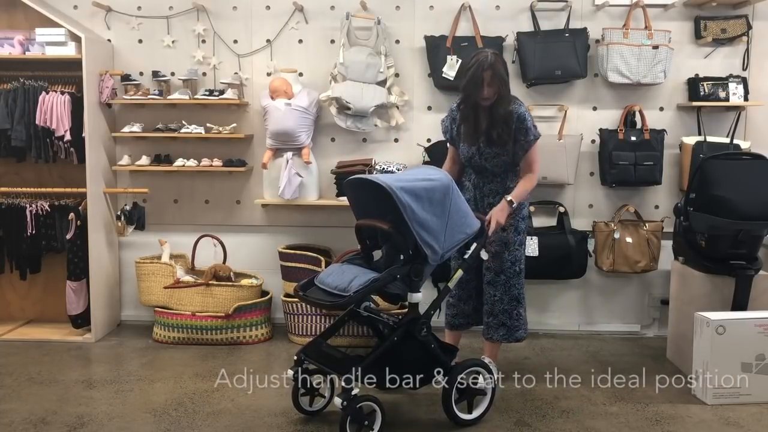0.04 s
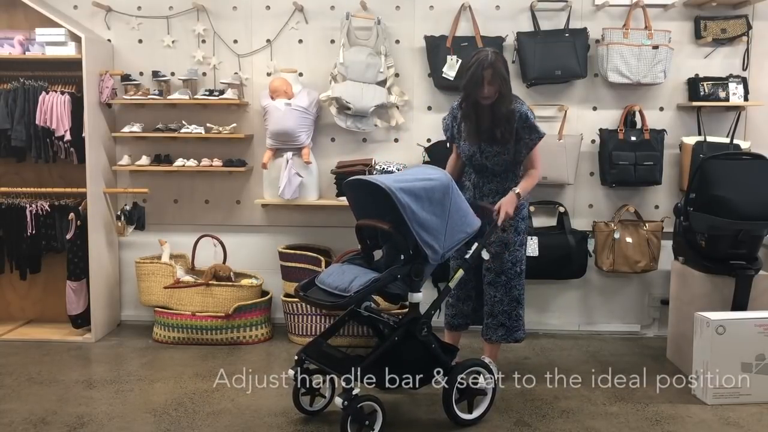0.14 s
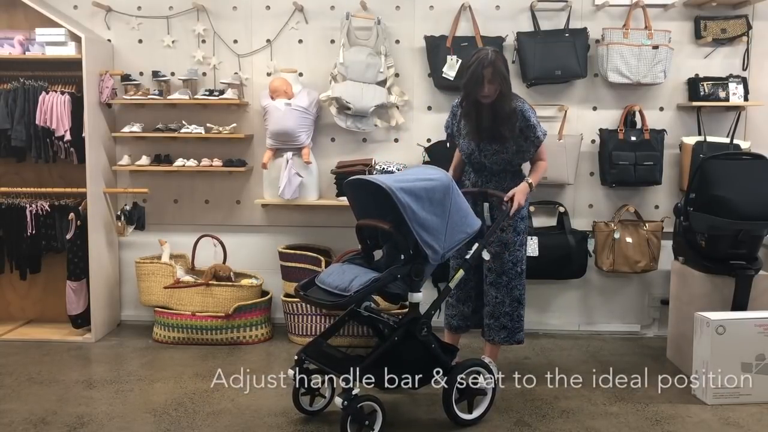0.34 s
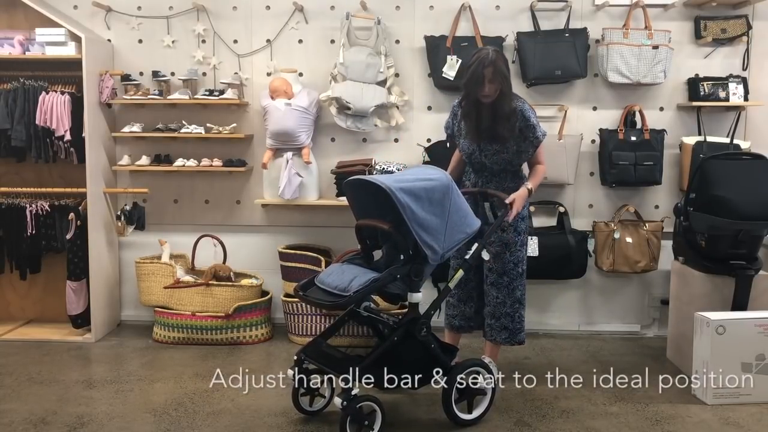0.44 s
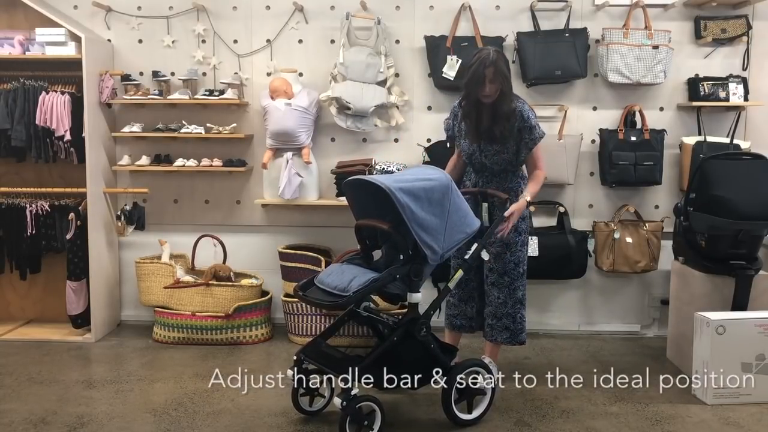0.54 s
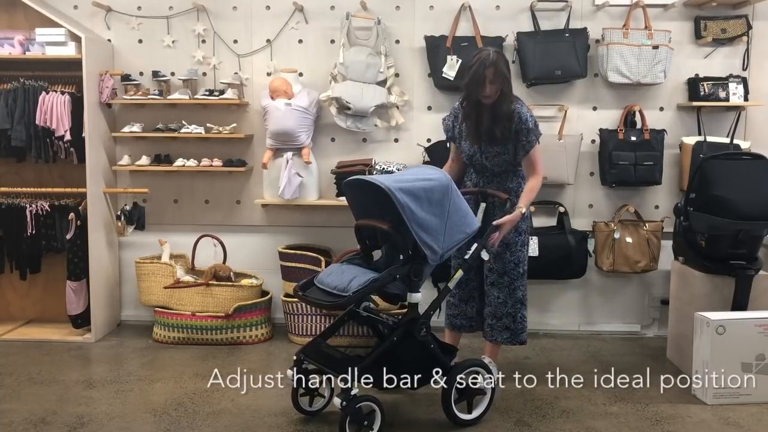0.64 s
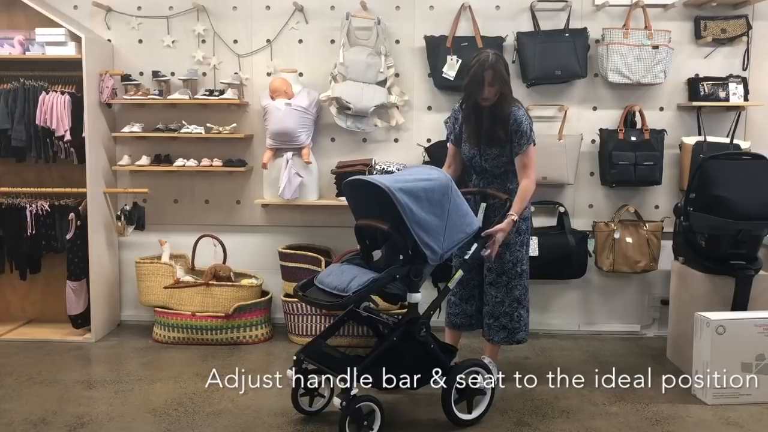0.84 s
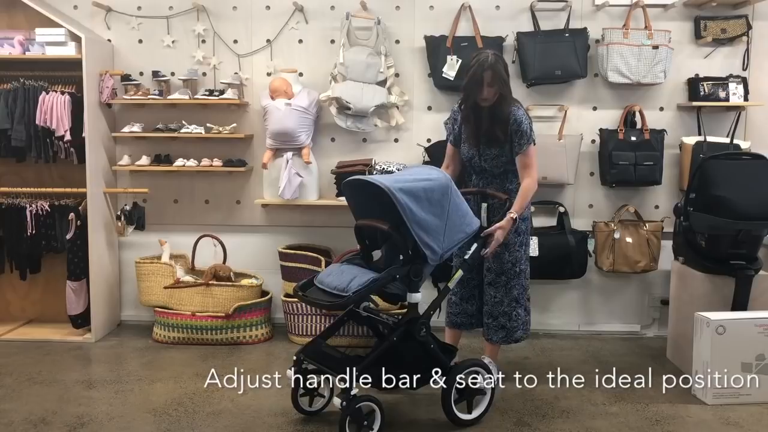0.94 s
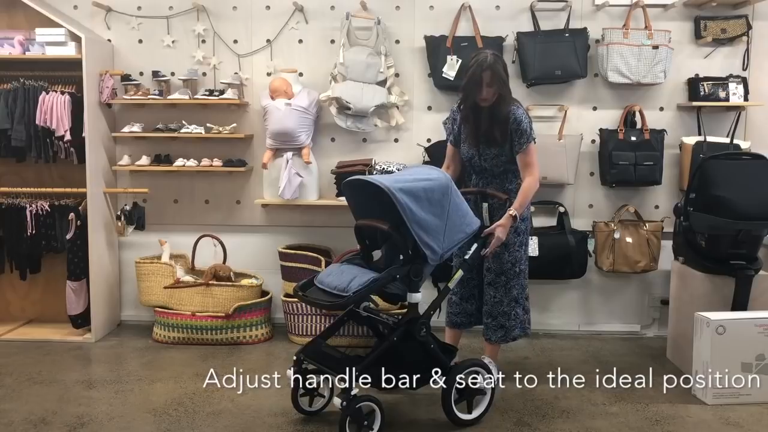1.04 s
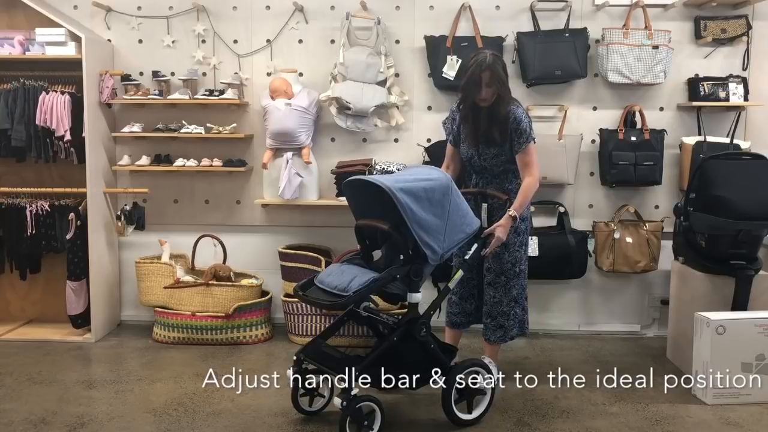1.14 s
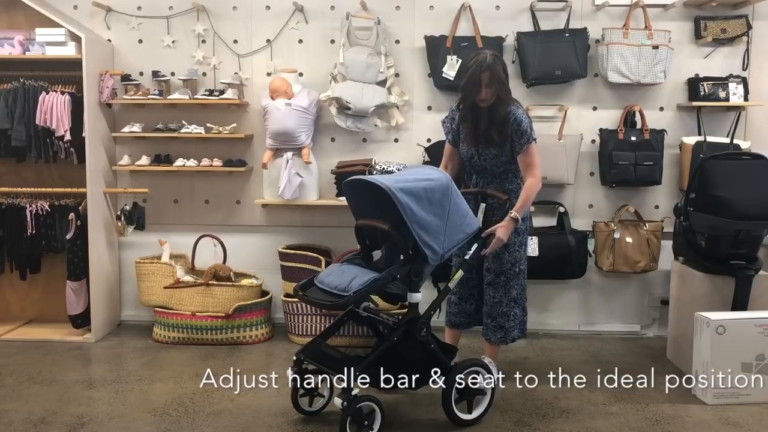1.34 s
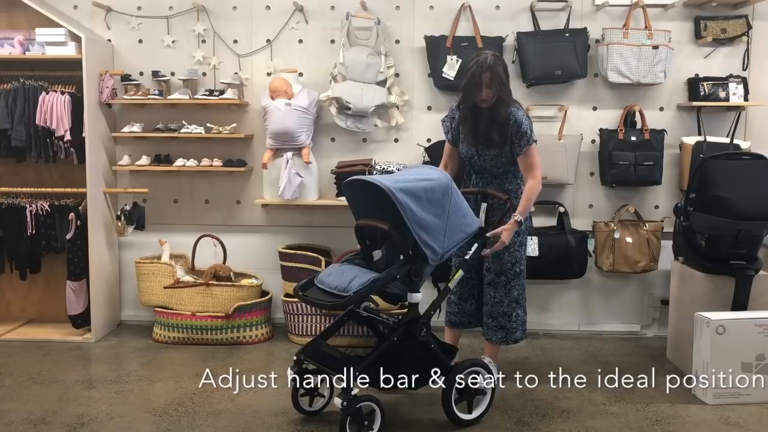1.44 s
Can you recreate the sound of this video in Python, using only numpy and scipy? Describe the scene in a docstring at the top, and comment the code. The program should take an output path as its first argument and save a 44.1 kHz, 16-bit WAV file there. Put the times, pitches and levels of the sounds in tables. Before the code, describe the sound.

A stroller handle is adjusted a few metres away in a quiet, slightly echoing shop: a short ratcheting rattle with a metallic ring, a faint fabric crackle, scattered ticks and knocks, and a final locking snap over soft ventilation.

```python
"""A stroller's handlebar is adjusted in a quiet shop, a few metres away. Over the hum of ventilation
the handled frame rumbles; the tube slides with a grainy rub and the plastic joint knocks. A pawl
rattles over seven ratchet teeth, setting the tube ringing, and the frame shudders. Fabric crackles
faintly, then the tube creeps on amid ticks of a small catch and more knocks. Last, the lock snaps
home and bounces. Each impact excites the resonances of its part and reverberates briefly."""
import sys
import numpy as np
from scipy import signal
from scipy.fft import rfft, irfft
from scipy.io import wavfile

SR = 44100
rng = np.random.default_rng(int(sys.argv[2]) if len(sys.argv) > 2 else 0)


def inscribe(sig):
    """Save sig as 16-bit PCM at rate SR to the path in sys.argv[1].

    A 1-D sig is mono; a 2-D sig holds one channel per row.
    Samples are clipped to [-1, 1] before scaling.
    """
    pcm = np.round(np.clip(np.atleast_2d(sig).T, -1, 1) * 32767)
    wavfile.write(sys.argv[1], SR, pcm.astype(np.int16))


N = 66150

# reverberation time of the shop: f/Hz, T60/s
ROOM_DECAY = [(150, 0.35), (700, 0.43), (2000, 0.67), (4000, 0.6148), (8000, 0.46), (11000, 0.3169),
              (16000, 0.27)]
# spectrum of the reverberant tail: f/Hz, level/dB
TAIL_SPECTRUM = [(150, 12), (1000, 0), (3000, 0), (8000, 0), (16000, -3)]
# spectrum of the ventilation noise: f/Hz, level/dB
AIR_SPECTRUM = [(20, -46), (31, -24.5), (42, -15.5), (55, 2.5), (75, -8), (110, 0.5), (180, -5.5),
                (350, -11), (900, -11), (1200, -14), (1600, -12.5), (2100, -11.5), (2800, -25.5),
                (7000, -31.5), (16000, -33)]
# partials of the hum: f/Hz, level/dB
HUM_PARTIALS = [(54, -70.5), (169, -74.5)]
# envelope of the handled frame's rumble: t/s, level/dB
RUMBLE_ENVELOPE = [(0, -76), (.2, -61), (.36, -56.5), (.55, -77), (.78, -75), (1.0, -58.5), (1.2, -57),
                   (1.5, -57.5)]
# spectrum of the rumble: f/Hz, level/dB
RUMBLE_SPECTRUM = [(25, -55), (60, -16), (105, -2), (135, -4), (155, -10.5), (169, 7), (188, -1.5),
                   (240, -8), (400, -14.5), (1500, -59)]
# envelope of the tube's first slide: t/s, level/dB
SLIDE_ENVELOPE = [(.06, -31.5), (.085, -10), (.103, 1), (.14, -0.5), (.16, -30)]
# spectrum of the sliding tube: f/Hz, level/dB
SLIDE_SPECTRUM = [(300, -7.5), (1000, -5.5), (4000, -1), (5300, -8.5), (6900, 11), (8100, -8), (9100, 3),
                  (10500, -2.5), (16000, -9)]
# knocks of the joint: t/s, level/dB, tilt/(dB per octave), resonance f/Hz, resonance gain/dB
JOINT_KNOCKS = [(.072, -15.5, -3, 950, 13.5), (0.859, -9.5, -7.5, 2020, 6.5), (0.9789, -5.5, 0, 3060, 15),
                (0.992, -15, -5, 570, 13), (1.07, -4, -1.5, 3390, 14.5), (1.076, -1.5, 1.5, 6130, 6)]
# spectrum of the plastic joint: f/Hz, level/dB
JOINT_SPECTRUM = [(100, -13.5), (400, -15), (1000, -2.5), (2000, 1.5), (3400, -2), (4500, 0.5),
                  (6200, -4.5), (8500, -7.5), (12000, -22), (16000, -30.5)]
# drops of the pawl: t/s, level/dB, time constant of the scrape before it/s, tilt/(dB per octave)
PAWL_DROPS = [(0.147, -5.5, 0.0018, -1.1), (0.1885, -2.5, 0.00085, 0.5), (.2237, -0.5, 0.0027, 0.5),
              (0.2554, 0.5, 0.004, 1), (0.2869, 0.5, 0.012, 2.5), (.3230, -3, 0.0024, 0.14),
              (0.3952, -12, 0.00067, -1.5)]
# spectrum of the ratchet: f/Hz, level/dB
RATCHET_SPECTRUM = [(59, -65), (100, -39.5), (266, -25.5), (547, -22.5), (595, -23.5), (801, -16),
                    (1130, -15), (1310, -12.5), (3120, -7.5), (3940, -4.5), (4670, -4.5), (8460, -1),
                    (16000, -8)]
# normal modes of the tube: f/Hz, level/dB, T60/s
TUBE_MODES = [(2001, -9.5, 0.73), (3910, -2, 0.6), (4410, -14, .35), (5700, -23, 0.19), (6180, 0, 0.42),
              (6540, 16, 0.1), (7200, -7, .25), (8381, 11, 0.12), (8500, 7.5, 0.41), (10000, -5, 0.13),
              (10680, 14.5, 0.12)]
# envelope of the frame's shudder: t/s, level/dB
SHUDDER_ENVELOPE = [(.33, -31), (.36, 4), (.39, -18), (.46, -17)]
# spectrum of the shudder: f/Hz, level/dB
SHUDDER_SPECTRUM = [(30, -30.5), (80, 0), (120, -6), (170, -3), (300, -15.5), (1000, -49)]
# envelope of the fabric's crackle: t/s, level/dB
FABRIC_ENVELOPE = [(.55, -18), (.6, 12), (.64, -8), (.67, -2), (.7, 0), (.74, -29), (.78, -7), (.83, 0),
                   (.87, -18)]
# spectrum of the fabric: f/Hz, level/dB
FABRIC_SPECTRUM = [(300, 3.5), (2000, -6.5), (6000, 5), (11000, 3), (16000, 0.5)]
# envelope of the tube's creep: t/s, level/dB
CREEP_ENVELOPE = [(.82, -25.5), (.86, -13), (.92, -1.5), (.97, -9), (1.01, -19), (1.06, -33)]
# spectrum of the creeping tube: f/Hz, level/dB
CREEP_SPECTRUM = [(300, -31), (950, -7), (1400, -21.5), (2000, -8), (2700, -12), (3500, -8.5), (4200, 6.5),
                  (5100, -4.5), (6100, 1), (7400, -19), (8500, 3.5), (10000, -10), (12500, -18),
                  (16000, -26)]
# ticks of the catch: t/s, level/dB, resonance f/Hz
CATCH_TICKS = [(0.8416, 2, 10000), (.884, 1.5, 9400), (0.915, -1, 8400), (.9245, -24, 9200),
               (0.9664, -2.5, 8400), (1.015, -18, 12500)]
# spectrum of the catch: f/Hz, level/dB
CATCH_SPECTRUM = [(300, -18), (2800, -6), (4200, -5.5), (5200, -10), (8500, 1), (11000, -2.5),
                  (12500, -6.5), (16000, -6.5)]
# impact and rebounds of the lock: t/s, level/dB
LOCK_SNAPS = [(1.2257, -1.5), (1.227, -2), (1.2326, -1)]
# spectrum of the lock: f/Hz, level/dB
LOCK_SPECTRUM = [(60, -50.5), (180, -18), (400, -19), (650, -9), (900, -16), (1200, -9), (1600, -16),
                 (2100, -7), (3400, -3.5), (4400, -5.5), (4900, -3.5), (5400, -10.5), (6200, -6),
                 (6550, -0.5), (7500, -1), (8500, -1), (9400, -8), (11000, -6), (13400, -14), (15300, -10)]


def amp(db):
    """Decibel law: amplitude grows tenfold for every 20 dB."""
    return 10 ** (np.asarray(db) / 20)


def unit(x):
    """Normalisation: scales a signal to energy 1."""
    return x / np.sqrt(np.sum(x ** 2) + 1e-20)


def curve_at(points, hz):
    """Interpolation on a logarithmic frequency axis."""
    f, value = np.transpose(points)
    return np.interp(np.log(hz + 1), np.log(f + 1), value)


def add(mix, start_s, sound):
    """Superposition: a sound adds to the mix from its onset."""
    part = mix[max(round(start_s * SR), 0):][:len(sound)]
    part += sound[:len(part)]


def envelope(points):
    """Amplitude envelope: linear in decibels between points, held beyond them."""
    return amp(np.interp(np.arange(N) / SR, *np.transpose(points)))


def body(spectrum, tilt_db=0, ring_hz=0, ring_db=0, width_hz=1, size=4096):
    """Minimum-phase impulse response, energy 1: a spectrum tilted above 800 Hz, plus one resonance."""
    hz = np.fft.rfftfreq(size, 1 / SR)
    db = curve_at(spectrum, hz) + tilt_db * np.log2(np.maximum(hz, 800))
    db += ring_db / (1 + (2 * (hz - ring_hz) / width_hz) ** 2)
    log_gain = np.log(amp(np.r_[db, db[-2:0:-1]]))
    transfer = np.exp(np.conj(signal.hilbert(log_gain)))
    return unit(np.fft.ifft(transfer).real[:size // 2])


def noise(spectrum):
    """Spectral shaping: white noise filtered to a given spectrum, rms 1."""
    gain = amp(curve_at(spectrum, np.fft.rfftfreq(N, 1 / SR)))
    shaped = irfft(rfft(rng.standard_normal(N)) * gain, N)
    return unit(shaped) * np.sqrt(N)


def grains(size, spread):
    """Random force: tiny impacts with a log-normal spread of strength."""
    return rng.standard_normal(size) * np.exp(spread * rng.standard_normal(size))


def friction(stroke, spectrum, spread):
    """Source and filter: a grainy friction force drives the response of the rubbed part."""
    force = grains(N, spread) * envelope(stroke)
    return signal.fftconvolve(force, body(spectrum))[:N]


def shop(x, tail_db=0, size=24576):
    """Reverberation: direct sound, early reflections from frame, floor and wall, then a decaying tail."""
    direct_db, early_db, early_s, tail_rise_s = -9.5, 1, 0.0091, 0.0043
    t = np.arange(size) / SR
    hz, age, bands = signal.stft(rng.standard_normal(size), SR, nperseg=256)
    t60 = curve_at(ROOM_DECAY, hz)[:, None]
    bands *= amp(tail_db + curve_at(TAIL_SPECTRUM, hz)[:, None] - 60 * age / t60)
    bands *= np.sqrt(2 * np.log(1000) / (t60 * SR))  # makes a band's energy independent of its T60
    response = signal.istft(bands, SR, nperseg=256)[1][:size] * (1 - np.exp(-t / tail_rise_s))
    reflections = grains(2048, spread=0.55) * np.exp(-(t[:2048] / early_s) ** 2)
    add(response, 0, amp(early_db) * unit(reflections))
    response[0] += amp(direct_db)
    return signal.fftconvolve(x, response)


def ventilation():
    """Stationary sound: broadband air noise with a faint hum of two pure tones."""
    t = np.arange(N) / SR
    hum = sum(amp(db) * np.sqrt(2) * np.sin(2 * np.pi * (hz * t + rng.random()))
              for hz, db in HUM_PARTIALS)
    return amp(-59) * noise(AIR_SPECTRUM) + hum


def frame_rumble():
    """Forced vibration: handling drives the frame at low frequencies."""
    return envelope(RUMBLE_ENVELOPE) * noise(RUMBLE_SPECTRUM)


def tube_slide():
    """Sliding friction: the tube rubs in its sleeve on the way to the first tooth."""
    return amp(-49) * friction(SLIDE_ENVELOPE, SLIDE_SPECTRUM, spread=0.33)


def joint_knocks():
    """Impact excitation: each blow on the plastic joint sounds a heavily damped resonance."""
    out = np.zeros(N)
    for start_s, db, tilt_db, ring_hz, ring_db in JOINT_KNOCKS:
        knock = body(JOINT_SPECTRUM, tilt_db, ring_hz, ring_db, width_hz=380)
        add(out, start_s, amp(db - 12.5) * shop(knock))
    return out


def ratchet(size=1024):
    """Modal excitation: the pawl scrapes up each tooth, drops and chatters; the tube rings freely."""
    ratchet_db, ring_db, chatter_db, chatter_s = 6, -1, 1.5, 0.0043
    out = np.zeros(N)
    t = np.arange(-size, size) / SR  # zero at the drop
    age = np.arange(SR // 2) / SR
    drop = 1. * (t == 0)
    for drop_s, db, scrape_s, tilt_db in PAWL_DROPS:
        scrape = unit(grains(len(t), spread=0.46) * (t < 0) * np.exp(-abs(t) / scrape_s))
        chatter = unit(grains(len(t), spread=0.65) * (t > 0) * np.exp(-abs(t) / chatter_s))
        response = body(RATCHET_SPECTRUM, tilt_db)
        for force in (scrape, drop, amp(chatter_db) * chatter):
            add(out, drop_s + t[0], amp(db) * shop(signal.fftconvolve(force, response)))
        ring = sum(amp(mode_db - 60 * age / t60) * np.sin(2 * np.pi * (hz * age + rng.random()))
                   for hz, mode_db, t60 in TUBE_MODES)
        add(out, drop_s, amp(db + ring_db) * unit(ring))
    return amp(ratchet_db) * out


def frame_shudder():
    """Transient vibration: the frame shakes briefly as the handlebar comes to rest."""
    return amp(-55) * envelope(SHUDDER_ENVELOPE) * noise(SHUDDER_SPECTRUM)


def fabric_crackle():
    """Irregular friction: fabric under the hands gives tiny impacts of very uneven strength."""
    return amp(-71.5) * friction(FABRIC_ENVELOPE, FABRIC_SPECTRUM, spread=1)


def tube_creep():
    """Sliding friction: the tube creeps on between the ticks of the catch."""
    return amp(-51.5) * friction(CREEP_ENVELOPE, CREEP_SPECTRUM, spread=0.33)


def catch_ticks():
    """Impulse response: the small catch answers each blow with a high, broad resonance."""
    out = np.zeros(N)
    for start_s, db, ring_hz in CATCH_TICKS:
        tick = body(CATCH_SPECTRUM, ring_hz=ring_hz, ring_db=8.5, width_hz=1400)
        add(out, start_s, amp(db - 19.5) * shop(tick))
    return out


def lock(size=2048):
    """Impact and rebound: the lock snaps home and bounces; its spring rings briefly as a damped mode."""
    clack_hz, clack_t60_s = 2960, 0.0097
    out, t = np.zeros(N), np.arange(size) / SR
    snap = amp(2) * body(LOCK_SPECTRUM, ring_hz=3040, ring_db=5, width_hz=550)
    clack = amp(-7.5) * unit(np.cos(2 * np.pi * clack_hz * t) * amp(-60 * t / clack_t60_s))
    for start_s, db in LOCK_SNAPS:
        add(out, start_s, amp(db) * shop(snap))
        add(out, start_s, amp(db) * shop(clack, tail_db=-9))  # aimed at the listener, so drier
    return out


def scene():
    """Superposition: friction, impacts and low background sounds sum in one channel."""
    rubbing = shop(tube_slide() + tube_creep() + fabric_crackle())[:N]
    impacts = ratchet() + catch_ticks() + joint_knocks() + lock()
    return (rubbing + impacts + frame_rumble() + frame_shudder() + ventilation())[None]


def record(dry):
    """Band limiting: a linear-phase low-pass filter removes the highest treble."""
    cutoff_hz = 15900
    lowpass = signal.firwin(511, cutoff_hz, window=("kaiser", 9), fs=SR)
    return signal.oaconvolve(dry, lowpass[None], "same")


dry = scene()
out = record(dry)
inscribe(out)
```